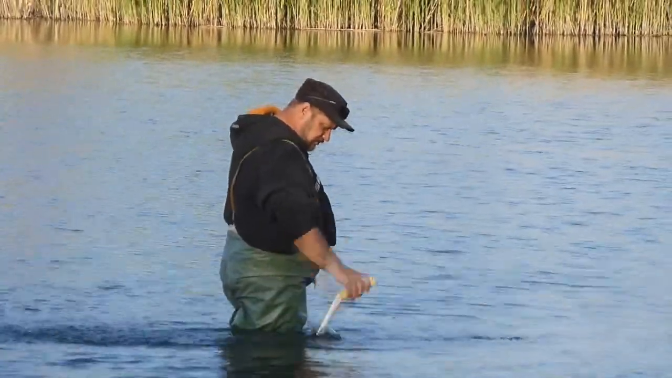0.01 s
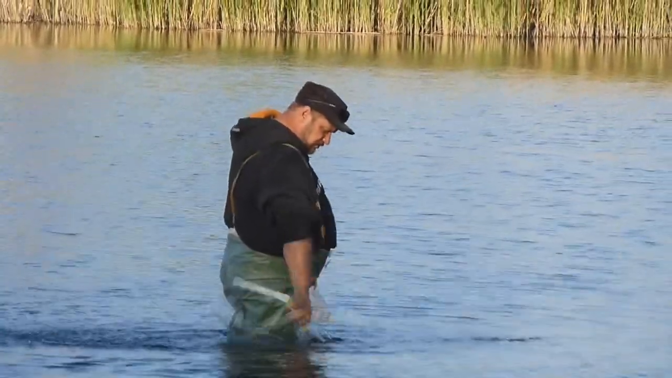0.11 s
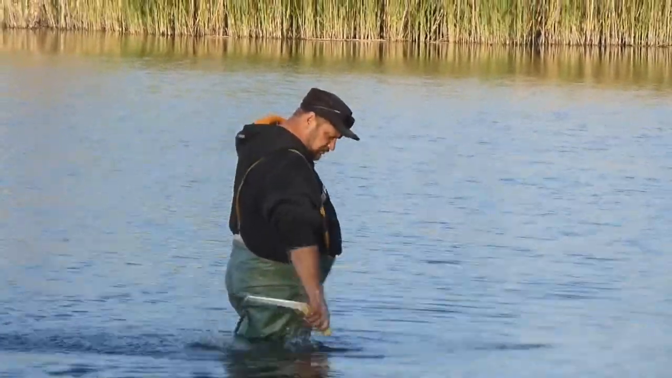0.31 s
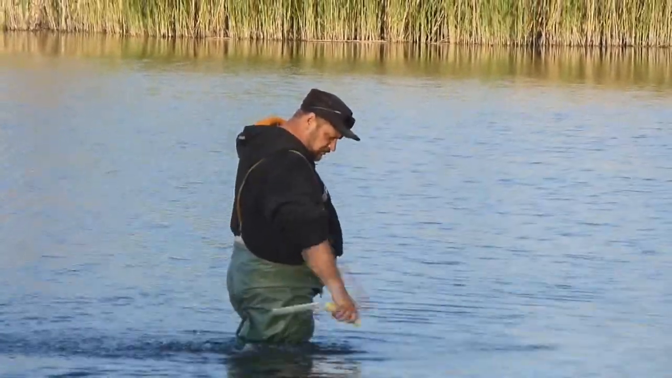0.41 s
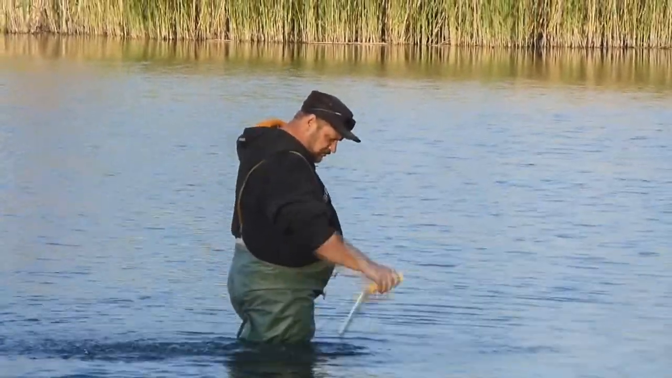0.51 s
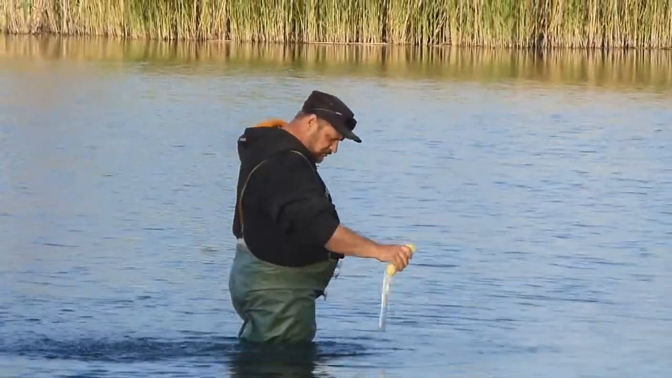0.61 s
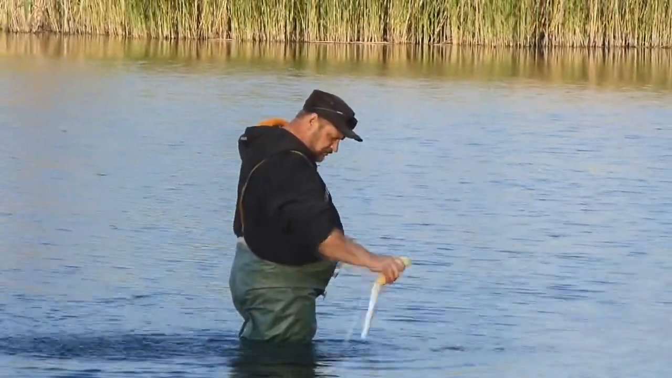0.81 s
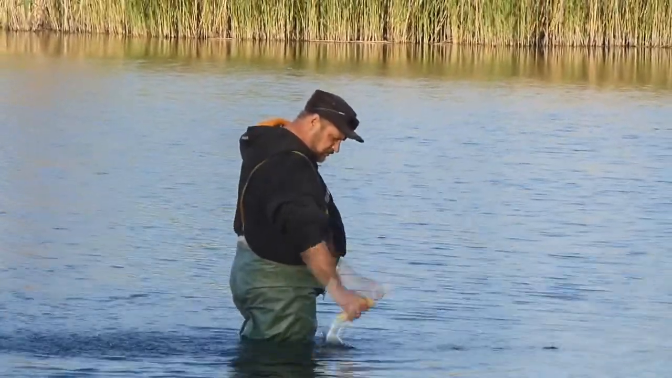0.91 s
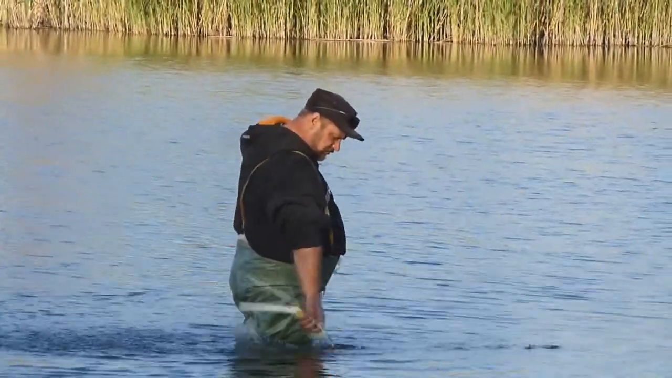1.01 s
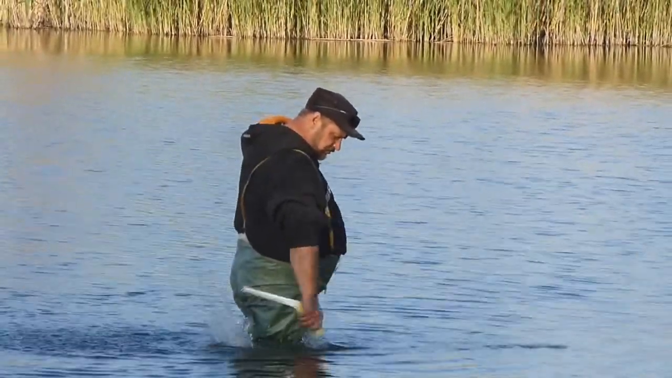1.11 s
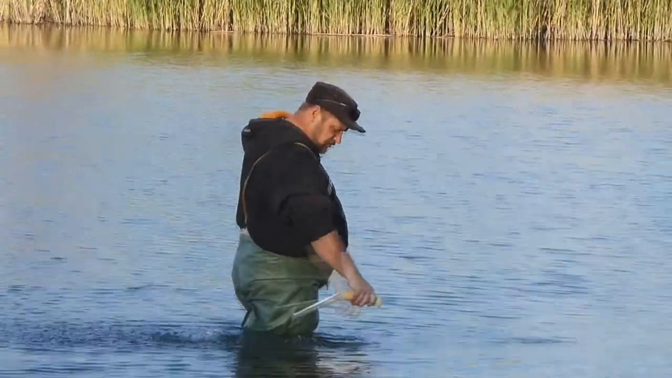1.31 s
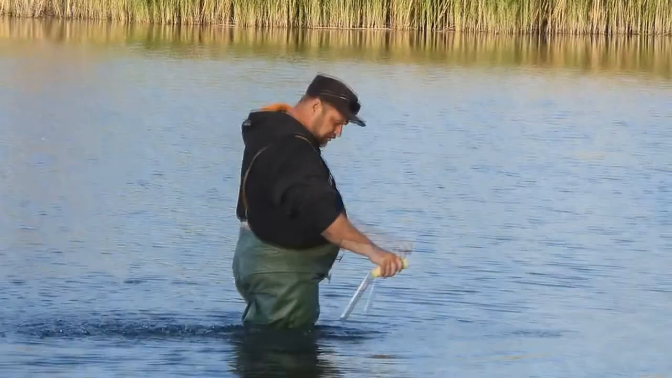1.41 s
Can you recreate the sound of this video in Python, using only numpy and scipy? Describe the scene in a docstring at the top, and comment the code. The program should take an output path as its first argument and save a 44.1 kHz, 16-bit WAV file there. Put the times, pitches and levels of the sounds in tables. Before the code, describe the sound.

A wooden tool slaps into lake water twice, each stroke making a low, quickly rising plop that stands out clearly and echoes softly off the shore. Small drips follow, over faint, faraway birdsong and a light outdoor hush.

```python
"""Wooden clonk on a lake

An angler standing in a lake strikes a wooden clonk into the water twice. Each stroke slaps the surface
and drags down an air pocket, which pinches off with a low, rising plop and a little spray.
The reedy shore answers softly; small splashes follow, and far birds call over the faint outdoor air."""
import sys
import numpy as np
from scipy import signal
from scipy.fft import rfft, irfft, next_fast_len
from scipy.io import wavfile
from scipy.ndimage import map_coordinates

SR = 44100
rng = np.random.default_rng(int(sys.argv[2]) if len(sys.argv) > 2 else 0)


def master_out(mix):
    """Clip the mix to full scale and print it as 16-bit PCM to the path in sys.argv[1]."""
    frames = np.transpose(np.atleast_2d(mix))
    ceiling = np.clip(frames, -1, 1)
    pcm = np.round(ceiling * 32767).astype(np.int16)
    wavfile.write(sys.argv[1], SR, pcm)


N = 66150

# Tone of the shore's echo, for strokes and birds (frequency [Hz], level [dB])
SHORE_TONE = [(80, -16), (170, -15), (260, -11), (380, -5.5), (600, 2.5), (1200, -1), (4000, 1),
              (12000, -18)]


def amp(db):
    """Decibels to gain."""
    return 10 ** (np.asarray(db) / 20)


def unit(x):
    """Scale to rms 1."""
    return x / np.sqrt(np.mean(x ** 2) + 1e-20)


def since(start):
    """Seconds since start, zero before it."""
    return np.maximum(np.arange(N) / SR - start, 0)


def wobble(rate):
    """A smooth random curve, rate knots a second."""
    knots = rng.standard_normal(int(N * rate / SR) + 4)
    return map_coordinates(knots, [np.arange(N) * rate / SR])


def noise(tone, edge_hz=None):
    """Noise of rms 1 coloured by (Hz, dB) points, dulled above an optional treble edge."""
    f = np.fft.rfftfreq(N, 1 / SR)
    hz, db = np.transpose(tone)
    gain = amp(np.interp(np.log(f + 1), np.log(hz), db))
    if edge_hz is not None:
        gain = gain / np.hypot(1, (f / edge_hz) ** 2)
    return unit(irfft(rfft(rng.standard_normal(N)) * gain, N))


def strike(start, attack_s, t60_s):
    """A quick rise and an exponential decay."""
    t = since(start)
    return (1 - np.exp(-t / attack_s)) * np.exp(-np.log(1000) * t / t60_s)


def swell(start, length):
    """A rounded rise and fall."""
    return np.sin(np.pi * np.minimum(since(start) / length, 1))


def echo(x, tone, delay_s, t60_s):
    """A diffuse reflection: x smeared through a decaying noise tail."""
    tail = noise(tone) * strike(delay_s, 0.0036, t60_s)
    return signal.fftconvolve(x, tail / np.linalg.norm(tail))[:N]


def air():
    """A faint, steady bed of outdoor air."""
    # Soft, dark hush (frequency [Hz], level [dB])
    air_tone = [(25, -9), (60, -6.5), (130, 2), (280, 1), (500, 0), (900, -4.5), (1800, -6.5), (3000, -12),
                (5000, -16.5), (9000, -19.5), (14000, -27), (15800, -29)]
    return amp(-54.5) * noise(air_tone)


def birds():
    """Gliding whistles blurred by distance, over a chorus still farther off."""
    # Far bird notes (time [s], length [s], first pitch [Hz], last pitch [Hz], level [dB])
    notes = [(.158, 0.027, 4950, 4780, -54.5), (.176, 0.029, 4450, 4030, -55), (.44, .035, 2770, 2610, -57),
             (0.492, 0.21, 2001, 2080, -62), (.515, 0.047, 2870, 2500, -53), (.6, 0.18, 2820, 2810, -60.5),
             (.74, 0.078, 2280, 2100, -61), (1.02, .08, 2180, 2320, -58), (1.23, 0.041, 2047, 2730, -57),
             (1.233, 0.023, 3070, 2860, -54.5), (1.31, 0.044, 3170, 3030, -54),
             (1.415, .06, 2750, 2490, -54.5)]
    # Rise and fall of the chorus (time [s], level [dB])
    chorus_level = [(0, -60), (.33, -69.5), (.45, -60), (.6, -56.5), (.75, -68), (.92, -74.5),
                    (1.101, -56.5), (1.3, -60), (1.5, -54)]
    # The blur of farther birds (frequency [Hz], level [dB])
    chorus_tone = [(1200, -39), (2000, -5), (2700, 2.5), (3300, -1.5), (4200, -10.5), (7000, -22.5)]
    song = np.zeros(N)
    for start, length, first_hz, last_hz, db in notes:
        hz = first_hz + (last_hz - first_hz) * np.minimum(since(start) / length, 1)
        waver = 1 + 0.0046 * wobble(200)
        phase = 2 * np.pi * np.cumsum(hz * waver) / SR
        flutter_db = wobble(90)
        song += amp(db + flutter_db) * swell(start, length) * np.sin(phase)
    reverb = amp(-11.5) * echo(song, SHORE_TONE, delay_s=0, t60_s=0.35)
    chorus_db = np.interp(since(0), *np.transpose(chorus_level)) + wobble(31.7)
    return song + reverb + amp(chorus_db) * noise(chorus_tone)


def slaps():
    """The clonk's head slaps the surface and gives the water one low push."""
    # The head meeting the water (time [s], slap [dB], treble edge [Hz], push [dB], push pitch [Hz])
    entries = [(0.2084, -25.5, 5500, -22, 137), (1.0958, -26, 10600, -18, 135)]
    # Hollow smack (frequency [Hz], level [dB])
    slap_tone = [(250, -19), (450, -14), (630, 8.5), (850, -8), (1400, -7), (3200, -15), (5000, -22),
                 (8000, -33), (15000, -33)]
    out = np.zeros(N)
    for start, slap_db, edge_hz, push_db, push_hz in entries:
        slap = noise(slap_tone, edge_hz) * strike(start + 0.00052, attack_s=0.001, t60_s=0.044)
        push = np.sin(2 * np.pi * push_hz * since(start)) * strike(start, attack_s=0.0037, t60_s=0.052)
        out += amp(slap_db) * slap + amp(push_db) * push
    return out


def plops():
    """The air pocket is pulled open, swings hard once, then rings on as its pitch climbs."""
    # Ringing air pockets (time [s], level [dB], glide from [Hz], glide to [Hz], onset to mid-glide [s],
    # glide time [s], steady climb [Hz/s], suction relative to level [dB])
    pockets = [(0.2202, -6.5, 220.3, 377, 0.0086, 0.00136, 2490, -39),
               (1.1162, -11, 113, 408, 0.0056, 0.0024, 537, -14)]
    suction_lead_s, suction_width_s = 0.00275, 0.0036  # pressure dips as the pocket opens
    surge_at_s, surge_width_s = 0.0049, 0.0029  # the big first swing
    out = np.zeros(N)
    for start, db, from_hz, to_hz, middle_s, glide_s, climb, suction_db in pockets:
        t = since(start)
        glide = (1 + np.tanh((t - middle_s) / (2 * glide_s))) / 2
        hz = from_hz + (to_hz - from_hz) * glide + climb * t
        phase = 2 * np.pi * np.cumsum(hz * (t > 0)) / SR
        suction = amp(suction_db) * np.exp(-((since(0) - start + suction_lead_s) / suction_width_s) ** 2)
        surge = np.exp(-((t - surge_at_s) / surge_width_s) ** 2)
        ring = amp(0.7) * strike(start, attack_s=0.0016, t60_s=0.064)
        out += amp(db) * ((surge + ring) * np.sin(phase) - suction)
    return out


def closings():
    """Water tears shut over the pocket and throws an uneven spray, whose drops fall back."""
    # The pocket closing (time [s], tear [dB], treble edge [Hz], length [s], spray [dB])
    tears = [(0.2177, -28, 3700, 0.0079, -36.5), (1.1098, -32, 11100, 0.012, -36)]
    # Short, wet rip (frequency [Hz], level [dB])
    tear_tone = [(300, -6), (620, 5), (800, -6.5), (1020, -1.5), (1500, -11), (3000, -7.5), (5000, -16.5),
                 (8500, -20), (15000, -24)]
    # Patter of spray (frequency [Hz], level [dB])
    spray_tone = [(300, -9), (600, 9), (1100, 0.5), (1700, -2), (3300, -5.5), (5500, -10.5), (10000, -17),
                  (15000, -31)]
    out = np.zeros(N)
    for start, tear_db, edge_hz, length, spray_db in tears:
        out += amp(tear_db) * noise(tear_tone, edge_hz) * swell(start, length)
        drops = unit(noise(spray_tone, edge_hz) * amp(1.8 * wobble(400)))
        out += amp(spray_db) * drops * strike(start + length / 2, attack_s=0.0045, t60_s=0.17)
    return out


def bubbles():
    """Small bubbles ring briefly, rising in pitch as they surface."""
    # Bubbles shed during and after the strokes (time [s], level [dB], pitch [Hz], t60 [s])
    blips = [(.2195, -19.5, 976, 0.028), (0.263, -35, 569, 0.081), (1.1115, -20.5, 590, 0.029),
             (1.281, -33.5, 705, 0.032), (1.291, -52, 1170, 0.021)]
    rise_per_s = 1.6  # share of the starting pitch
    out = np.zeros(N)
    for start, db, hz, t60_s in blips:
        t = since(start)
        phase = 2 * np.pi * hz * t * (1 + rise_per_s * t / 2)
        out += amp(db) * strike(start, attack_s=0.0028, t60_s=t60_s) * np.sin(phase)
    return out


def surface_radiation(x, low_cut_hz):
    """The water surface radiates little deep bass."""
    ratio = (np.fft.rfftfreq(N, 1 / SR) / low_cut_hz) ** 4
    return irfft(rfft(x) * ratio / (1 + ratio), N)


def shore_echoes(strokes):
    """The shore returns a diffuse wash, and the reed bank a later, fainter answer."""
    # Reflection off the reeds (frequency [Hz], level [dB])
    bank_tone = [(100, -24), (230, -15), (350, 9), (440, 2), (600, 2), (1500, 4.5), (6000, -15.5)]
    wash = amp(-22.5) * echo(strokes, SHORE_TONE, delay_s=0.015, t60_s=0.81)
    answer = amp(-42) * echo(strokes, bank_tone, delay_s=0.13, t60_s=0.24)
    return wash + answer


def water_grains(bursts, tone, grain_db):
    """Short, grainy swells of disturbed water."""
    level = sum(amp(db) * swell(start, length) for start, db, length in bursts)
    return level * unit(noise(tone) * amp(grain_db * wobble(500)))


def sprinkles():
    """Fine drops sprinkle on the lake."""
    # Flurries of drops (time [s], level [dB], length [s])
    flurries = [(.45, -61, 0.032), (.845, -64, 0.038), (1.3, -65.5, 0.086)]
    # Bright fizz (frequency [Hz], level [dB])
    fizz_tone = [(2000, -14), (4500, 7), (8000, 2), (12500, 0), (15500, -16)]
    return water_grains(flurries, fizz_tone, grain_db=6.5)


def splashes():
    """The clonk stirs up small splashes as it moves through the water."""
    # Small splashes (time [s], level [dB], length [s])
    stirs = [(1.277, -46, 0.027), (1.447, -49, 0.021)]
    # Midrange slosh (frequency [Hz], level [dB])
    slosh_tone = [(250, -9), (550, -14), (730, 14), (950, -13), (1150, 7), (1600, -30), (3500, -16),
                  (6000, -20), (15000, -32)]
    return water_grains(stirs, slosh_tone, grain_db=6)


def scene():
    """The strokes and their echoes, small water sounds, birds and air, in mono."""
    strokes = surface_radiation(slaps() + plops() + closings(), low_cut_hz=62)
    echoes = shore_echoes(strokes)
    water = bubbles() + splashes() + sprinkles()
    return (strokes + echoes + water + birds() + air())[None]


def record(dry):
    """Gain control ducks the level a little after a loud plop; the highest treble is cut off."""
    threshold_db, slope, attack_s, release_s = -24, 0.2, 0.055, 0.29
    top_hz = 15750
    power = dry ** 2
    for seconds in (release_s, attack_s):  # two smoothing stages follow the power
        keep = np.exp(-1 / (seconds * SR))
        power = signal.lfilter([1 - keep], [1, -keep], power)
    ducked = dry / (1 + power / amp(threshold_db) ** 2) ** slope
    size = next_fast_len(N + SR // 2)
    passband = np.fft.rfftfreq(size, 1 / SR) < top_hz
    return irfft(rfft(ducked, size) * passband, size)[..., :N]


dry = scene()
out = record(dry)
master_out(out)
```